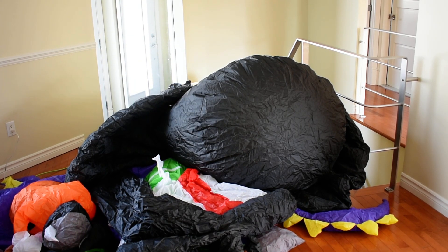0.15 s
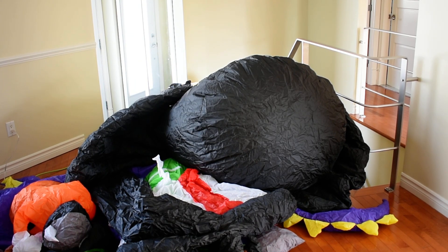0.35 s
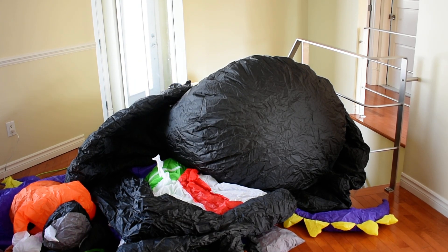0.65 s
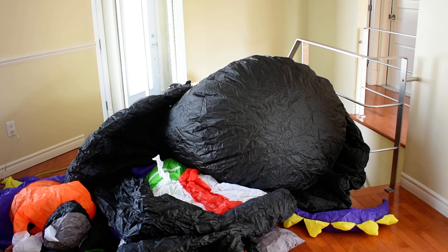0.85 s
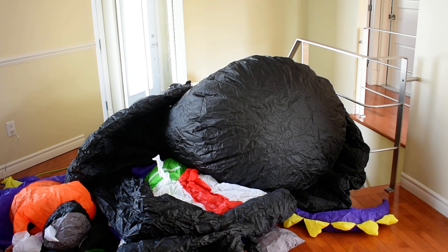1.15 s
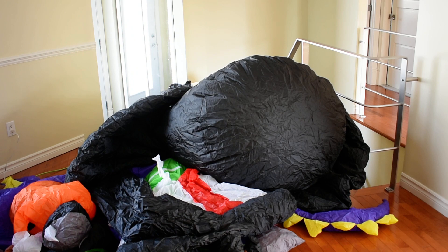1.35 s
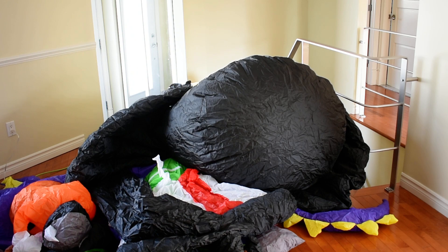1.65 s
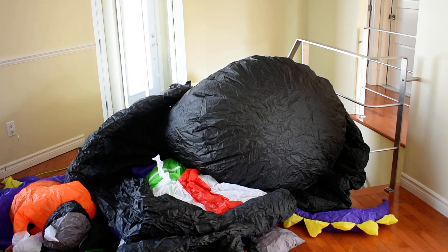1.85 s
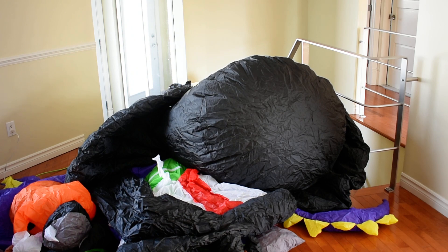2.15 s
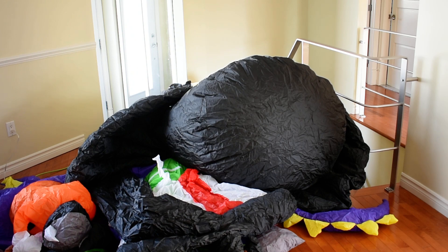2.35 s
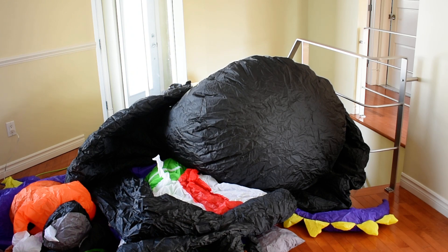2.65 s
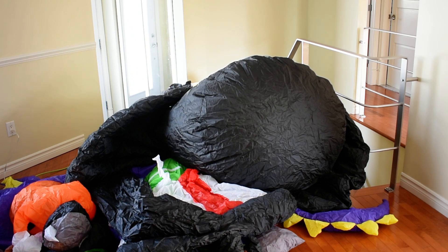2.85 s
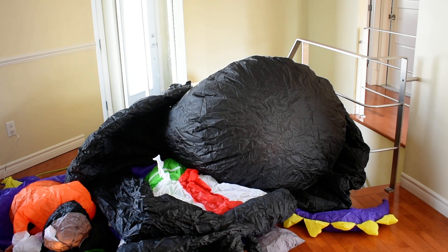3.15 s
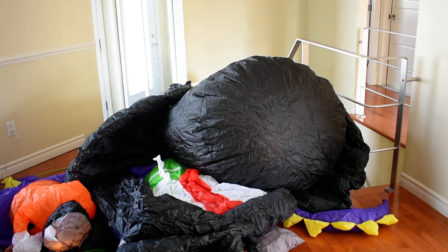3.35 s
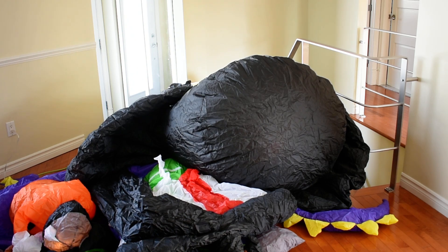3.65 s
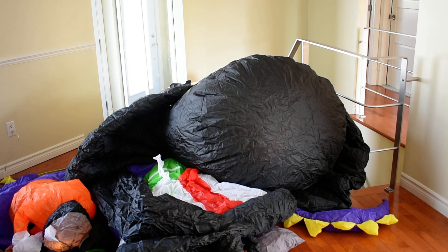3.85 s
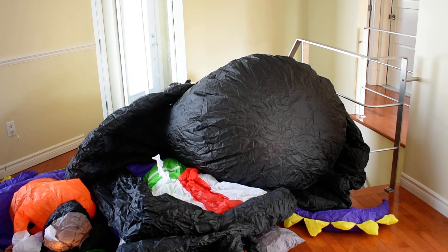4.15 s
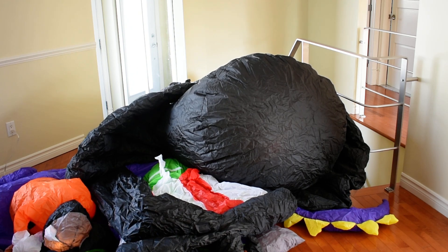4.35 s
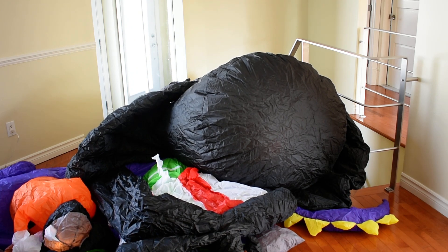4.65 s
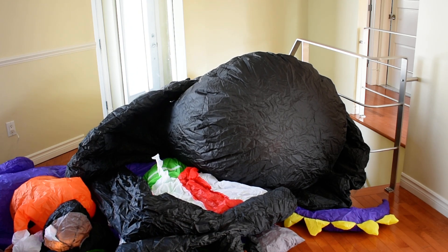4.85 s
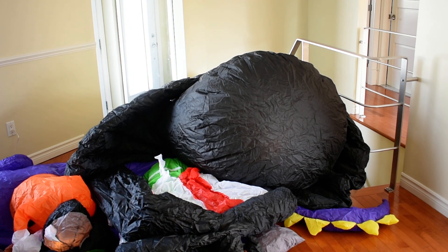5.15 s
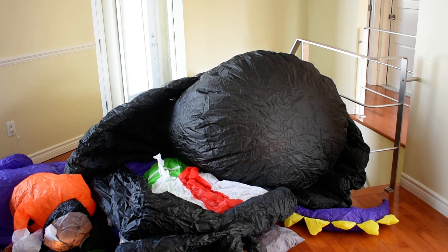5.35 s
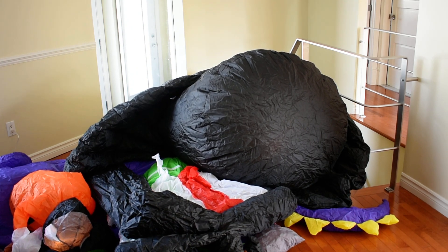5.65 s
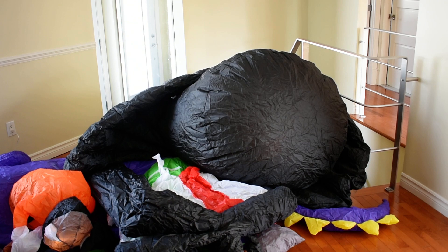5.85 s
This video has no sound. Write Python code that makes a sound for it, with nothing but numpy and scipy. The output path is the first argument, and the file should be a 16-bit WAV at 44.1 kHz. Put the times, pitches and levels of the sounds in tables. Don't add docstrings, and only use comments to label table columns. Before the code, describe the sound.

A quiet, hard-walled room with faint hiss: a sharp clack, light taps, soft footfalls and clothing rustle. At about 2.5 seconds a plug knocks firmly into a socket, a second follows more softly, and bright plastic snaps burst near 3.2 seconds. Two small blowers spin up, swelling by 4 seconds into a steady rush of air with a thin whine. The microphone stays in the room, with the handling off to one side.

```python
import sys
import numpy as np
from scipy import signal
from scipy.fft import rfft, irfft, next_fast_len
from scipy.io import wavfile
from scipy.ndimage import uniform_filter1d, map_coordinates

SR = 44100
rng = np.random.default_rng(int(sys.argv[2]) if len(sys.argv) > 2 else 0)


def elevation(decibels):
    levels = np.asarray(decibels, float)
    return 10 ** (levels / 20)


def output_pcm(signal):
    pcm = np.clip(np.atleast_2d(signal).T, -1, 1) * 32767
    wavfile.write(sys.argv[1], SR, np.round(pcm).astype(np.int16))


N = 264600

# (time [s], blade-pass frequency [Hz], whine level [dB])
FIRST_WHEEL = [(2.56, 250, -90), (3.45, 1090, -60), (3.7, 1275, -47), (3.92, 1368, -35), (4.1, 1393, -33.5),
               (4.32, 1401, -31), (4.8, 1392, -37), (5.13, 1385, -32), (5.3, 1384, -38), (5.47, 1387, -30),
               (5.6, 1384, -39), (5.72, 1394, -31), (6, 1398, -33)]
SECOND_WHEEL = [(2.88, 250, -90), (3.75, 1010, -64), (4.12, 1250, -55), (4.26, 1330, -42),
                (4.42, 1385, -49), (4.7, 1447, -41), (5.05, 1468, -40), (5.3, 1475, -38), (6, 1474, -38)]
# (frequency [Hz], width [Hz], lift [dB])
STANDING_WAVES = [(28.2, 5.9, 15.5), (64, 14, -6), (89.9, 8, -4), (155.4, 8, 14), (286, 40, 5),
                  (361, 44, 3), (426.4, 36, 4.5), (477, 15, 7), (523.4, 20, 6.5), (930, 13, 8.5),
                  (977, 11, 6.5), (1038, 9.2, 7.5), (1460, 37, 1), (1457, 17, 6)]


def unit(x):
    return x / np.sqrt(np.mean(x ** 2) + 1e-20)


def along(points, hz):
    f, v = np.transpose(points)
    return np.interp(np.log(hz + 1), np.log(f + 1), v)


def curves(rows):
    s, *columns = np.transpose(rows)
    return [np.interp(np.arange(N) / SR, s, c) for c in columns]


def wobble(rate_hz):
    knots = rng.standard_normal(int(N * rate_hz / SR) + 4)
    return map_coordinates(knots, [np.arange(N) * rate_hz / SR])


def filtered(x, response):
    m = next_fast_len(len(x) + 8192)
    return irfft(rfft(x, m) * response(np.fft.rfftfreq(m, 1 / SR)), m)[:len(x)]


def resonance(f, centre_hz, width_hz):
    return 1j * f * width_hz / (centre_hz ** 2 - f * f + 1j * f * width_hz)


def rush(spectrum, patchy_db=0, waves=()):
    z = signal.stft(rng.standard_normal(N), nperseg=512)[2]
    patches = uniform_filter1d(rng.standard_normal(z.shape), size=6, axis=0)
    patches = uniform_filter1d(patches, size=14, axis=1)
    white = signal.istft(z * elevation(patchy_db * unit(patches)), nperseg=512)[1][:N]

    def response(hz):
        lift_db = sum(db * abs(resonance(hz, c, w)) ** 2 for c, w, db in waves)
        return elevation(along(spectrum, hz) + lift_db)
    return unit(filtered(white, response))


def add(out, x, s):
    part = out[round(s * SR):][:len(x)]
    part += x[:len(part)]


def room(x):
    # (frequency [Hz], t60 [s])
    wall_t60 = [(150, 0.53), (400, 0.56), (1000, 0.57), (2800, 0.51), (7300, 0.43), (15000, 0.3)]
    hz, t, z = signal.stft(rng.standard_normal(SR // 2), SR, nperseg=256)
    decay = elevation(-60 * t / along(wall_t60, hz)[:, None])
    tail = signal.istft(z * decay, SR, nperseg=256)[1]
    return signal.fftconvolve(np.pad(x, (150, 0)), tail / np.linalg.norm(tail))


def causal(spectrum):
    c = irfft(np.log(elevation(along(spectrum, np.fft.rfftfreq(4096, 1 / SR))) + 1e-6))
    c[1:2048] *= 2
    c[2049:] = 0
    pulse = irfft(np.exp(rfft(c)))[:2048]
    return pulse / np.linalg.norm(pulse)


def scrape(length_s, rise_s=0.00062):
    t = np.arange(SR // 8) / SR
    rise = 1 - np.exp(-t / max(rise_s, .0001))
    fall = elevation(-20 * t / np.clip(length_s, .001, .06))
    return rng.standard_normal(len(t)) * rise * fall


def contact(rows, colour):
    out = np.zeros(N)
    pulse = causal(colour)
    for s, peak_db, length_s, room_db, rise_s in rows:
        direct = signal.fftconvolve(scrape(length_s, rise_s), pulse)
        direct *= elevation(peak_db) / abs(direct).max()
        add(out, direct, s)
        add(out, elevation(room_db) * np.linalg.norm(direct) * room(pulse), s)
    return out


def stillness():
    # (frequency [Hz], density [dB per Hz])
    air_colour = [(12, -40), (20, 0), (38, -1), (93, -11), (142, -8.5), (301, -3.5), (328, -12), (410, -8),
                  (485, -13), (542, -13), (2260, -21.5), (6910, -26), (16000, -35.5)]
    rumble_colour = [(12, -47), (28, -1), (48, -2), (65, -22), (100, -51)]
    rumble = elevation(-64 + 3 * wobble(4)) * rush(rumble_colour)
    return elevation(-53) * rush(air_colour) + rumble


def clothes():
    # (frequency [Hz], density [dB per Hz])
    cloth_colour = [(300, 0), (900, 0), (2000, -1.5), (4000, -8.5), (9000, -20)]
    # (time [s], length [s], level [dB])
    moves = [
        (0.02, .2, -59),
        (0.477, 0.7, -57.5),
        (.95, 0.37, -55),
        (1.36, 0.4, -53),
        (1.646, 0.42, -60),
        (2.85, 0.41, -60.5),
        (3.3, 0.53, -50),
    ]
    t = np.arange(N) / SR
    power = sum(elevation(db) ** 2 * np.exp(-(3.0 * (t - s) / length_s) ** 2) for s, length_s, db in moves)
    return np.sqrt(power) * rush(cloth_colour, patchy_db=3.0)


def thuds():
    # (time [s], peak level [dB], board frequency [Hz], joist level [dB], joist frequency [Hz])
    footfalls = [(.125, -35, 213, -5.5, 154), (.15, -42, 420, -13, 151), (0.019, -36, 402, -3, 160),
                 (0.671, -36, 184, -7.5, 77.4), (0.701, -44, 394, -25, 60), (0.995, -44, 166, -19, 60),
                 (1.040, -40.5, 580, -4.5, 169), (1.056, -44, 650, -5, 300), (1.594, -46.5, 696, 0, 155),
                 (2.554, -30, 141, -16, 45), (2.865, -35, 252, -5.5, 120), (2.885, -30.5, 244, -9, 29.8),
                 (3.79, -33, 156, -10, 45)]
    length_s = 0.036
    out = np.zeros(N)
    for s, peak_db, board_hz, joist_db, joist_hz in footfalls:
        board = filtered(scrape(length_s), lambda f: (resonance(f, board_hz, 0.61 * board_hz) ** 2
                                                      + 0.18 * resonance(f, 454, 350)))
        joist = filtered(scrape(length_s), lambda f: resonance(f, joist_hz, 0.49 * joist_hz) ** 2)
        direct = board / abs(board).max() + elevation(joist_db) * joist / abs(joist).max()
        direct *= elevation(peak_db)
        add(out, direct, s)
        add(out, elevation(-1.5) * room(direct), s)
    return out


def taps():
    # (time [s], peak level [dB], length [s], room level [dB], rise [s])
    hits = [
        (.0205, -40, 0.017, -10, 0.0011),
        (.4035, -55, .01, 5, .001),
        (.585, -46, .02, -1.5, .004),
        (.6595, -28, 0.0076, -4, 0.00059),
        (.665, -29.5, .007, -7, .0008),
        (1.04, -41, 0.033, -9, .002),
        (1.4735, -38, .006, 1, .0004),
        (.908, -46, 0.063, 2, 0.0065),
    ]
    # (frequency [Hz], density [dB per Hz])
    colour = [(290, -48), (600, -17), (1300, -3), (1800, -1.5), (2400, -4), (3200, -9), (4400, -15),
              (5300, -20.5), (9800, -34), (16000, -55)]
    return contact(hits, colour)


def clacks():
    # (time [s], peak level [dB], length [s], room level [dB], rise [s])
    hits = [
        (.1172, -21, 0.0099, 2, .0006),
        (.154, -49, .004, -13, .0008),
    ]
    # (frequency [Hz], density [dB per Hz])
    colour = [(35, -44), (96, -23), (139, -21), (280, -2), (715, -7.5), (1900, -24.5), (3500, -16.5),
              (4400, -15), (5100, -11), (5700, -21.5), (6600, -34), (10000, -33), (16000, -51)]
    return contact(hits, colour)


def plug():
    # (time [s], peak level [dB], length [s], room level [dB], rise [s])
    hits = [
        (2.5435, -25.5, 0.016, -16, 0.0041),
        (2.5535, -18, 0.0037, -2, 0.00043),
        (2.5572, -19, 0.014, -0.5, 0.00055),
        (2.568, -32, .006, -8, .0008),
        (2.581, -33, 0.007, -4, .0008),
    ]
    # (frequency [Hz], density [dB per Hz])
    colour = [(35, -26), (60, -25), (156, -5), (458, -7.5), (651, -6.5), (842, -11), (1340, -7),
              (2090, -11), (2770, -1.5), (4640, -18), (5330, -15), (12700, -22), (16000, -30)]
    return contact(hits, colour)


def socket():
    # (time [s], peak level [dB], length [s], room level [dB], rise [s])
    hits = [
        (1.473, -42, .007, -7, .0005),
        (1.49, -42, .008, -2, .0008),
        (2.863, -40, 0.016, -3, 0.0027),
        (2.8745, -35, 0.012, 4.5, .0015),
        (2.885, -30.5, 0.0072, -3, 0.00091),
    ]
    # (frequency [Hz], density [dB per Hz])
    colour = [(240, -29), (400, -5), (598, -8), (708, -4), (789, -13), (906, -3), (1490, -11), (2880, 2),
              (3690, -12), (13100, -21), (16000, -41)]
    return contact(hits, colour)


def snaps():
    # (time [s], peak level [dB], length [s], room level [dB], rise [s])
    hits = [
        (1.0345, -36, .005, 0, .0004),
        (1.5994, -45, .005, -2, 0.0011),
        (3.247, -21, 0.0052, -5, 0.0011),
        (3.2488, -18, 0.0041, -5.5, 0.00054),
        (3.2525, -14.5, 0.007, -4, 0.00076),
        (4.94, -38, 0.0074, -3, .002),
        (3.2562, -20, 0.0043, 2.5, .0005),
        (3.272, -28, 0.0068, -9, 0.0014),
        (3.5662, -32.5, .006, 1, 0.0017),
        (3.8394, -28.5, 0.0049, 4, .0015),
    ]
    # (frequency [Hz], density [dB per Hz])
    colour = [(350, -75), (600, -45), (1010, -4), (1290, -27), (1730, -7.5), (2760, -4.5), (3160, -8.5),
              (3730, -5.5), (5630, -16), (9890, -14), (14900, -21), (16000, -32)]
    return contact(hits, colour)


def shell_rings():
    # (time [s], peak level [dB], frequency [Hz], t60 [s])
    rings = [
        (.1187, -25.5, 4950, 0.011),
        (1.474, -42, 2920, .014),
        (3.2488, -23.5, 9840, 0.0091),
        (2.5543, -13, 3070, 0.006),
        (2.887, -38, 2900, 0.016),
        (3.252, -20, 2805, 0.012),
    ]
    out, t = np.zeros(N), np.arange(SR // 20) / SR
    onset = 1 - np.exp(-t / 0.00094)
    for s, db, hz, t60_s in rings:
        add(out, elevation(db + 7.5 - 60 * t / t60_s) * onset * np.sin(2 * np.pi * hz * t), s)
    return out


def prong_ring():
    # (frequency [Hz], level [dB], t60 [s])
    modes = [(3610, -5, .48), (4700, -11, .2), (9948, -11, .2), (10120, -10, .16), (10400, -12, .15)]
    out, t = np.zeros(N), np.arange(SR // 3) / SR
    ring = sum(elevation(db - 60 * t / t60_s) * np.sin(2 * np.pi * hz * t) for hz, db, t60_s in modes)
    beating = ring * (1 - .4 * np.sin(2 * np.pi * 21 * t))
    add(out, elevation(-45) * beating, 1.036)
    return out


def speed(wheel):
    full_hz = 1400
    powered = np.arange(N) / SR > wheel[0][0]
    return curves(wheel)[0] / full_hz * powered


def flow(db, power, second_db):
    knee = 0.98
    one, two = (np.tanh((speed(wheel) / knee) ** power) for wheel in (FIRST_WHEEL, SECOND_WHEEL))
    return elevation(db + 1.5) * np.hypot(one, elevation(second_db) * two)


def shaft(wheel, db):
    turns_hz = curves(wheel)[0] / 29.5
    gain = elevation(db + 2.5 * wobble(2.7)) * (turns_hz / 48) ** 6
    return gain * np.sin(2 * np.pi * np.cumsum(turns_hz) / SR)


def hum():
    # (frequency [Hz], density [dB per Hz])
    hum_colour = [(8.8, -38), (15, -9), (40, -4), (58, -10), (75, -17), (92, -22), (118, -51), (146, 3.5),
                  (183, -16), (200, -8.5), (260, -2), (440, -120)]
    gain = flow(-46.5, power=6.4, second_db=-6.5) * elevation(1.1 * wobble(6))
    low_air = gain * rush(hum_colour, 0.31, STANDING_WAVES)
    return low_air + shaft(FIRST_WHEEL, db=-61.0) + shaft(SECOND_WHEEL, db=-54.5)


def roar(surge):
    # (frequency [Hz], density [dB per Hz])
    roar_colour = [(110, -34), (180, -13), (280, -5.5), (338, -4.5), (371, 0.5), (537, -8), (582, -10.5),
                   (684, -14.5), (800, -15.5), (1040, -55), (1760, -120)]
    gain = flow(-28, power=4.14, second_db=-4) * elevation(0.3 * surge + 0.13 * wobble(11))
    air = gain * rush(roar_colour, 0.97, STANDING_WAVES)
    slow = np.clip((.86 - speed(FIRST_WHEEL)) / 0.21, 0, 1)
    return (1 - slow) * air + 1.23 * slow * filtered(air, lambda f: resonance(f, 250, 140))


def body(surge):
    # (frequency [Hz], density [dB per Hz])
    body_colour = [(320, -21), (550, -8.5), (685, -10), (950, -5), (1240, -6.5), (1410, -5.5), (1570, -8.5),
                   (3000, -18.5), (3900, -31), (6600, -120)]
    gain = flow(-31.5, power=6, second_db=-7.5) * elevation(0.87 * surge)
    return gain * rush(body_colour, 0.68, STANDING_WAVES)


def hiss(surge):
    # (frequency [Hz], density [dB per Hz])
    hiss_colour = [(1290, -6.5), (2200, -2.5), (2890, -4.5), (4030, -7), (7210, -11.5), (10100, -17),
                   (13400, -24.5), (15100, -32), (16000, -48)]
    gain = flow(-39, power=6, second_db=-3) * elevation(0.37 * surge)
    return gain * rush(hiss_colour, 0.95)


def whine(hz, db, flutter_db, drift_hz):
    phase = 2 * np.pi * np.cumsum(hz + drift_hz * wobble(25)) / SR
    level_db = db + flutter_db * (wobble(18) + 0.74 * wobble(7.7))
    return np.sqrt(2) * elevation(level_db) * np.sin(phase)


def outlet():
    filled_s, slide_hz, slide_s, fade_db_per_s = 5.1, 119, .25, 18
    after_s = np.clip(np.arange(N) / SR - filled_s, 0, None)
    hz = 927 + slide_hz * (1 - np.exp(-(after_s / slide_s) ** 2))
    tone = whine(hz, -46.5 - fade_db_per_s * after_s, flutter_db=0.0, drift_hz=4.18)
    return speed(FIRST_WHEEL) ** 4.8 * tone * wobble(16)


def blowers():
    surge = wobble(3.74)
    air = roar(surge) + body(surge) + hiss(surge) + hum()
    first_whine = whine(*curves(FIRST_WHEEL), flutter_db=0.9, drift_hz=2.3)
    second_whine = whine(*curves(SECOND_WHEEL), flutter_db=0.5, drift_hz=1.6)
    return air + outlet() + first_whine + second_whine


def scene():
    background = stillness() + clothes() + thuds()
    contacts = taps() + clacks() + plug() + socket() + snaps()
    rings = shell_rings() + prong_ring()
    return (background + contacts + rings + blowers())[None]


def roll_off(x):
    return signal.sosfilt(signal.butter(12, 16520, fs=SR, output="sos"), x)


def record(dry):
    def band_limit(hz):
        first_db = np.clip((hz - 15810) / 12, 0, 25)
        second_db = np.clip((hz - 16400) / 8, 0, 90)
        return elevation(-first_db - second_db)
    mix = filtered(dry[0], band_limit)[None]
    return roll_off(mix)


dry = scene()
out = record(dry)
output_pcm(out)
```